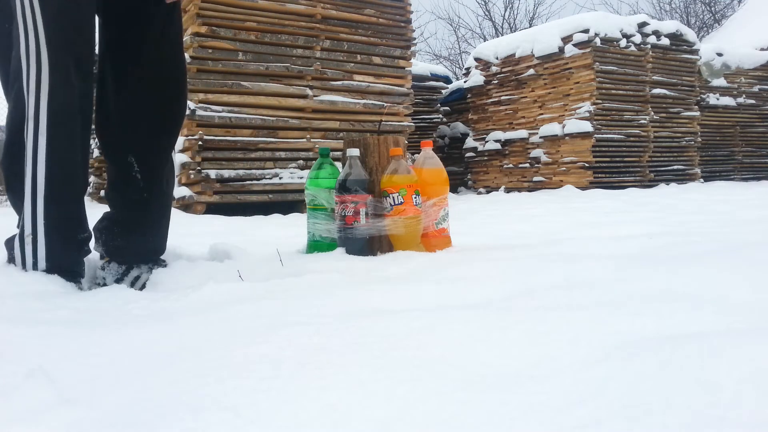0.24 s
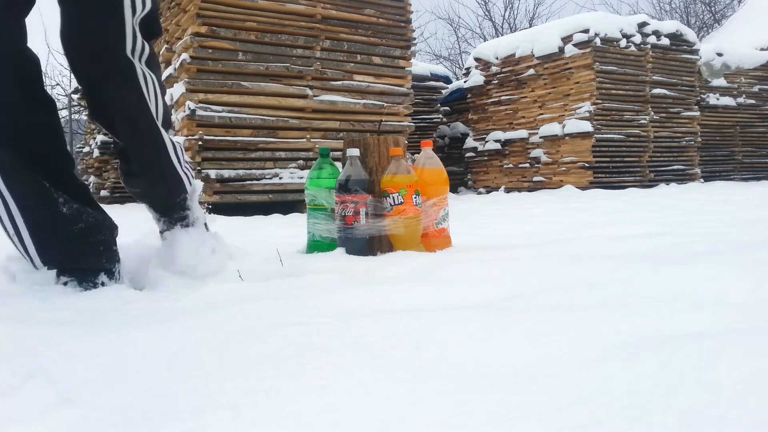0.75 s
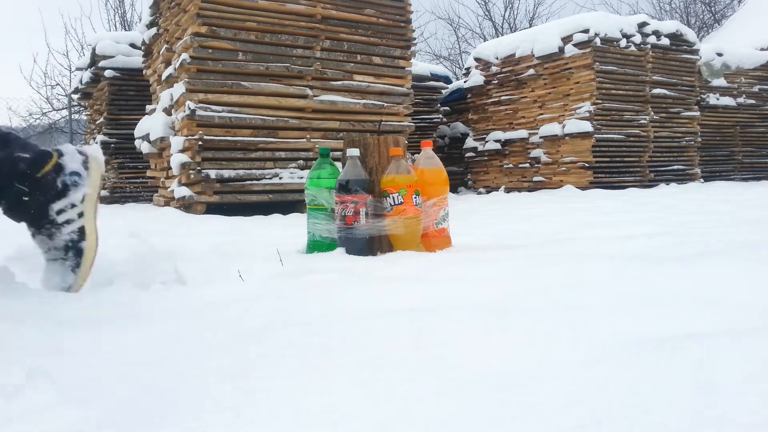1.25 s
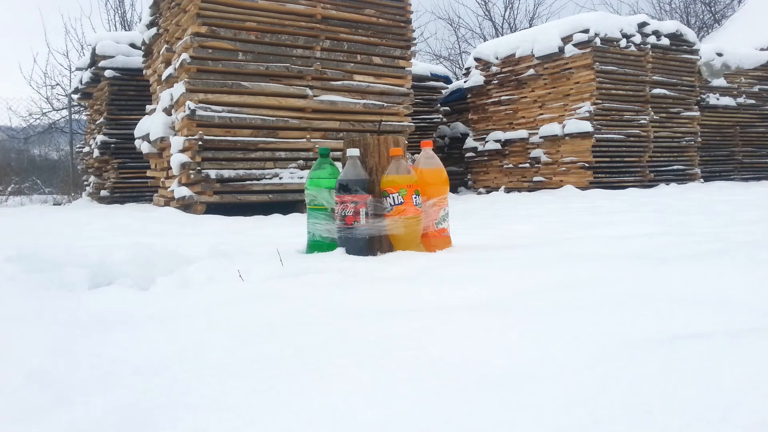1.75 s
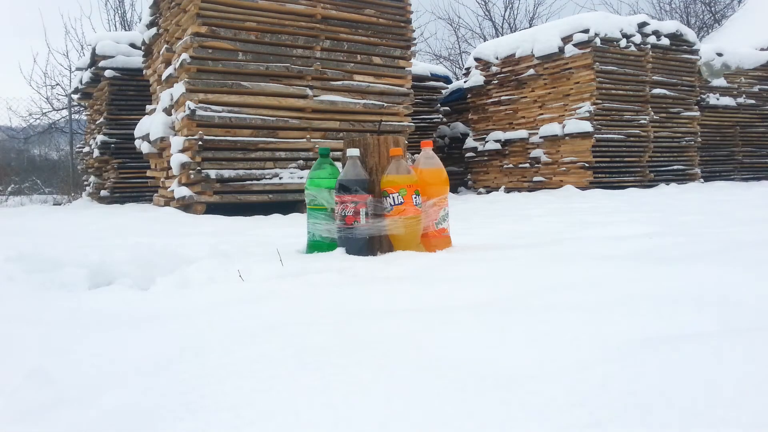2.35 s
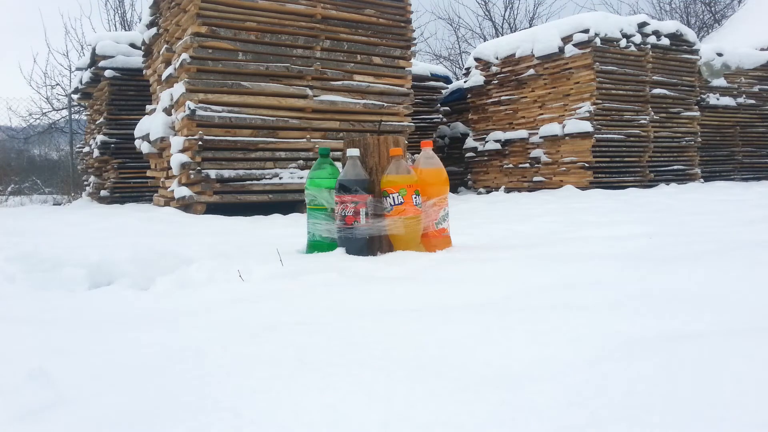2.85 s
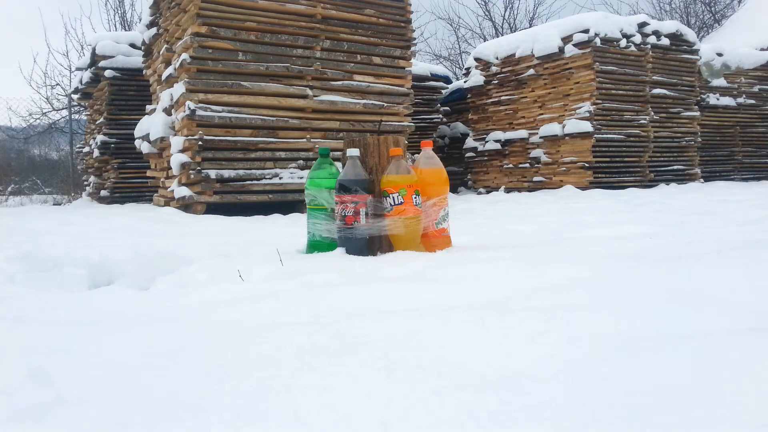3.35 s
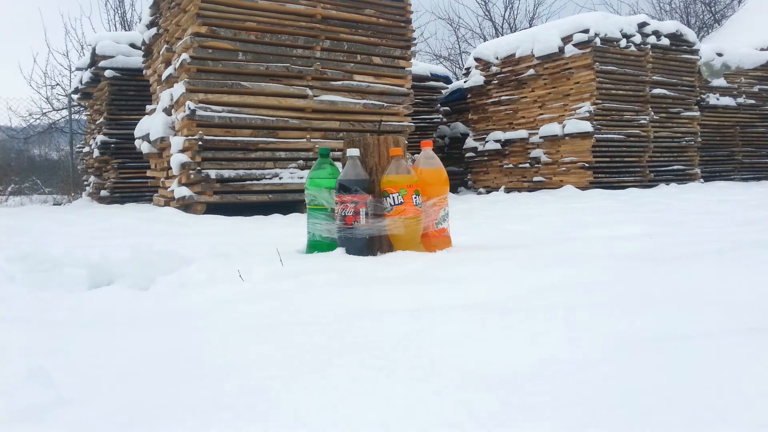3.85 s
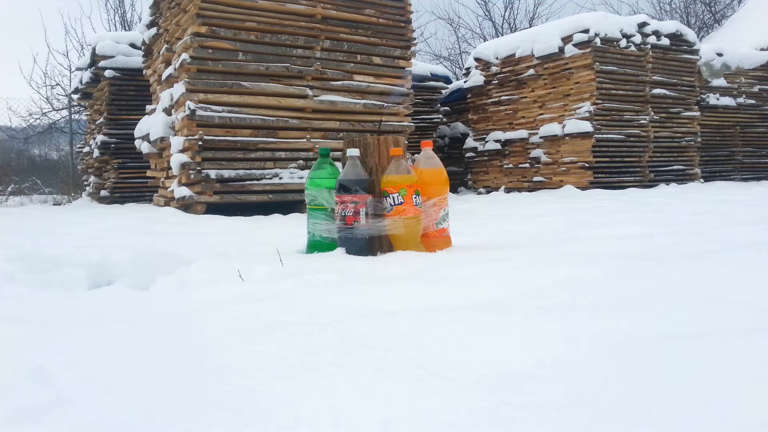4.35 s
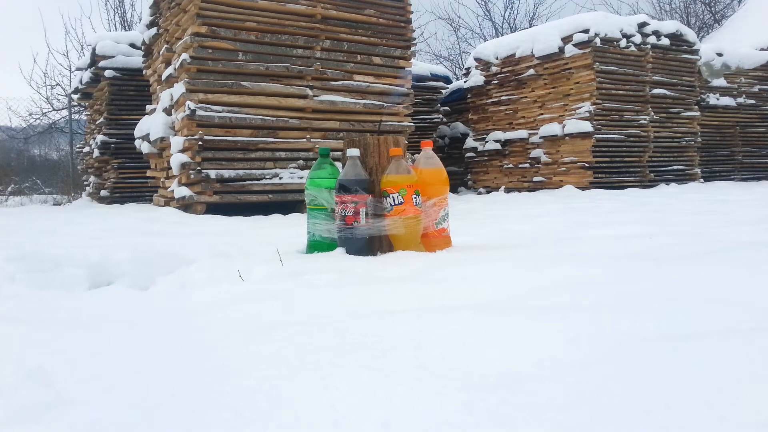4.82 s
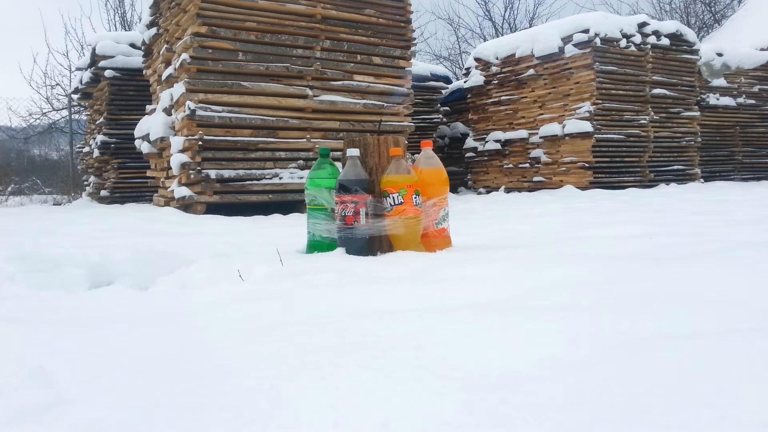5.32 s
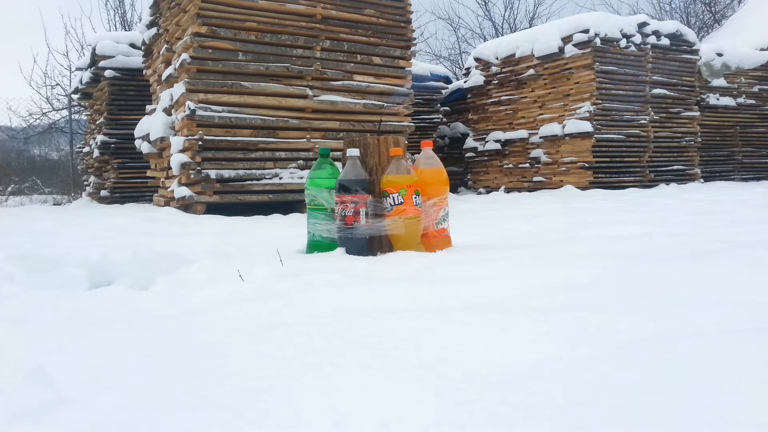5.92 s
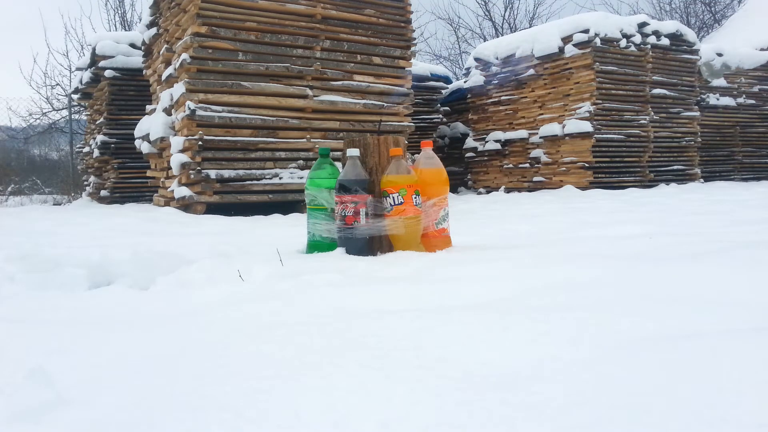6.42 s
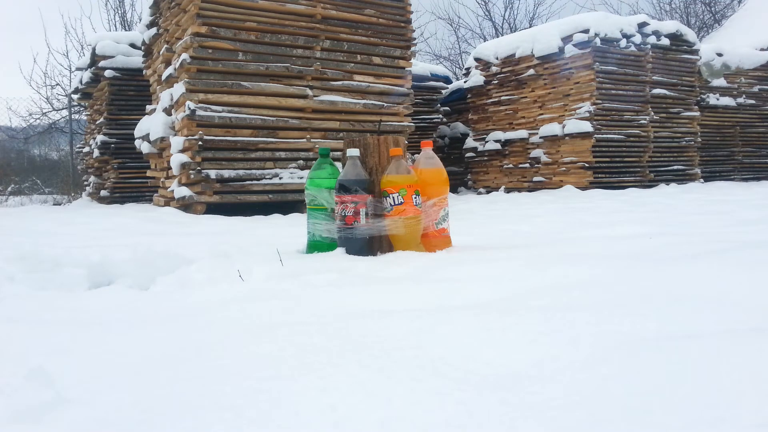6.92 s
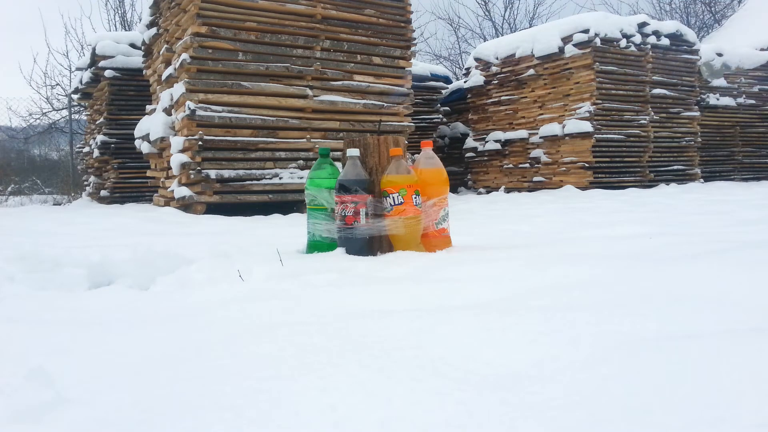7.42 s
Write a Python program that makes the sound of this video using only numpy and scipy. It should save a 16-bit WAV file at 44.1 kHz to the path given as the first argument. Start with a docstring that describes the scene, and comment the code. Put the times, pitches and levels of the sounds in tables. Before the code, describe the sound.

In a quiet snowy yard, shoes shift and crunch close by as a fuse fizzes and pops softly, with one much louder pop. It flares into a rough, sputtering jet full of snapping sparks, then thins to a bright steady fizz with a faint high whistle. Later, muffled jogging steps scuff away in the snow and one small hard clack sounds on the left. Stereo microphones near the ground, dry open air.

```python
"""Firecracker fuse in a snowy yard

A fuse sputters and pops, flares into a rough rushing jet, then settles to a bright fizz.
Jet and fizz are shaped noise with sparks and crackles; short chokes dip both, and spits swell the jet.
Pops are short filtered pulses, and a thin whistle of wavering sine tone runs throughout.
Shoes shift in the snow and jog further off, made of tiny random clicks; one sharp clack rings out."""
import sys
import numpy as np
from scipy import signal
from scipy.fft import rfft, irfft, next_fast_len
from scipy.io import wavfile
from scipy.ndimage import uniform_filter1d

SR = 44100
rng = np.random.default_rng(int(sys.argv[2]) if len(sys.argv) > 2 else 0)


def wav_record(signal):
    """Record a signal, one row per channel, as 16-bit PCM in the file named by sys.argv[1]."""
    frames = np.transpose(np.atleast_2d(signal))
    bounded = np.clip(frames, -1, 1)
    # unit amplitude maps onto the largest positive 16-bit level
    quanta = np.round(bounded * 32767).astype(np.int16)
    wavfile.write(sys.argv[1], SR, quanta)


N = 338247
TIME = np.arange(N) / SR  # seconds
SNOW_SETTLE_S = 0.054  # how slowly a step in the snow dies away


def from_db(db):
    """Turn decibels into a gain."""
    return 10 ** (np.asarray(db) / 20)


def rms_one(x):
    """Scale to an average power of 1."""
    return x / np.sqrt(np.mean(x ** 2) + 1e-20)


def in_time(rows):
    """Join the points of a (time, value) table by straight lines."""
    s, value = np.transpose(rows)
    return np.interp(TIME, s, value)


def over_hz(points):
    """Read a (frequency, value) table at every frequency of the spectrum, on a log axis."""
    hz, value = np.transpose(points)
    size = next_fast_len(N)
    spectrum_hz = np.arange(size // 2 + 1) * SR / size
    return np.interp(np.log(spectrum_hz + 1), np.log(hz), value)


def shape(x, gain):
    """Filter a sound by one gain per frequency."""
    size = next_fast_len(N)
    return irfft(rfft(x, size) * gain, size)[..., :N]


def band_pass(x, order, low_hz, high_hz):
    """Keep what lies between two frequencies."""
    return signal.sosfilt(signal.butter(order, [low_hz, high_hz], "band", fs=SR, output="sos"), x)


def drift(rate_hz):
    """Smooth random wandering with spread 1, made at a fortieth of the sample rate."""
    r = np.exp(-80 * np.pi * rate_hz / SR)
    slow = signal.lfilter([1], [1, -2 * r, r * r], rng.standard_normal(N // 40 + 2002))
    slow = slow[2000:]  # skip the filter's start-up
    return np.interp(np.arange(N) / 40, np.arange(len(slow)), rms_one(slow))


def grains(per_s, spread_db):
    """Random clicks of unequal size; a positive spread makes a few large, a negative one a few small."""
    sizes = from_db(spread_db * np.minimum(rng.exponential(1, N), 4)) * rng.choice([-1, 1], N)
    happens = rng.random(N) < per_s / SR
    return rms_one(sizes * happens / np.sqrt(per_s))


def bursts(rows, fall_s):
    """Add up events (s, dB, hold s, swell s): each swells, holds, then dies away."""
    out = np.zeros(N)
    for s, level_db, hold_s, swell_s in rows:
        start = max(int(s * SR), 0)
        age = TIME[start:][:SR] - s
        fade = np.exp(-np.maximum(age - hold_s, 0) / fall_s)
        out[start:][:SR] += from_db(level_db) * np.clip(age / swell_s, 0, 1) * fade
    return out


def outdoors(source, colour):
    """Colour a source; scatter from the snow and woodpiles makes the two channels differ."""
    # how alike the channels are: f/Hz, likeness/0-1 (anything above 1 counts as 1)
    likeness = [(100, 1.05), (400, 0.36), (900, 0.5), (2500, 0.77), (6000, 0.63), (13000, 0.22)]
    gain = rms_one(from_db(over_hz(colour)))
    alike = np.clip(over_hz(likeness), 0, 1)
    size = int(0.013 * SR)
    scatter = rng.standard_normal((2, size)) * np.linspace(1, 0, size) ** 2
    scatter /= np.sqrt(np.sum(scatter ** 2, axis=1, keepdims=True))
    # the scattered part is fresh noise that follows the source's smeared power
    power = signal.fftconvolve(source[None] ** 2, scatter ** 2, axes=1)[:, :N]
    diffuse = np.sqrt(np.maximum(power, 0)) * rng.standard_normal((2, N))
    return shape(source, gain * np.sqrt(alike)) + shape(diffuse, gain * np.sqrt(1 - alike))


def choking():
    """The flame is held back for an instant: each choke is a smooth dip (one is a slight rise), in dB."""
    # chokes: t/s, depth/dB, half-width/s
    choke_rows = [(0.639, 4, 0.023), (0.945, 3, 0.011), (1.499, 7.5, 0.0037), (1.762, 5, 0.023),
                  (1.883, 2.5, 0.012), (1.964, 4.5, 0.01), (2.227, 2.5, 0.021), (2.316, 2.5, 0.01),
                  (2.392, 7, 0.0046), (2.66, 9, 0.0052), (3.04, 4.5, 0.03), (3.27, -0.5, 0.021),
                  (3.455, 1.5, 0.021), (3.54, 12, 0.03), (3.615, 6.5, 0.017), (4.066, 3, 0.017),
                  (4.535, 3.5, 0.0099), (4.653, 4, 0.016), (4.773, 4, 0.034), (5.147, 5, 0.02),
                  (5.483, 6, 0.012), (6.03, 4.5, 0.021)]
    return sum(depth_db * np.exp(-.5 * ((TIME - s) / width_s) ** 2) for s, depth_db, width_s in choke_rows)


def fizz(lift_db=1.0, flutter_db=0.57, sway_db=1.0, crackle_db=-7, choke_share=0.99, sluggish_s=.025):
    """Powder grains flash one after another in a bright hiss that sways and dips with the longer chokes."""
    # slow strength of the fizz, before the lift: t/s, level/dB
    fizz_strength = [(-0.0, -51), (0.801, -49), (1.502, -55.5), (2.831, -47), (3.475, -49.5), (4.278, -44),
                     (4.416, -47.5), (4.841, -43), (5.313, -48.5), (5.85, -45.5), (6.756, -43.5),
                     (6.922, -45.5), (7.384, -43), (7.671, -42.5)]
    # its colour, relative: f/Hz, level/dB
    fizz_colour = [(120, -48), (250, -24), (500, -8), (1200, -4.5), (2500, -4), (4300, 0.5), (5500, 0.5),
                   (6400, 3.5), (8000, 1), (10400, 1), (11500, -1.5), (14500, -4)]
    # averaging over a short while blurs the shortest chokes
    dip_db = choke_share * uniform_filter1d(choking(), size=max(int(sluggish_s * SR), 1))
    wander_db = flutter_db * drift(23) + sway_db * drift(6.8)
    level_db = in_time(fizz_strength) + lift_db - dip_db + wander_db
    crackle = from_db(crackle_db) * grains(1500, spread_db=3.0)
    powder = rms_one(rng.standard_normal(N) + crackle)
    return outdoors(powder * from_db(level_db), fizz_colour)


def crunch(powder_db, clump_db):
    """Snow gives way in clumps of tiny fractures over a soft hiss of powder."""
    fractures = grains(750 * from_db(3 * drift(30)), spread_db=3.0)
    snow = fractures + from_db(powder_db) * rng.standard_normal(N)
    return rms_one(snow * from_db(clump_db * drift(66)))


def shuffling():
    """Close by, shoes shift in the snow as swells of crunch, and the crust snaps in brief noise bursts."""
    # shoes shifting: t/s, level/dB, hold/s
    shuffle_rows = [(0, -40, 0.063), (0.137, -53, .015), (0.213, -48, 0.09), (0.344, -49.5, 0.07),
                    (0.453, -56, 0.0085), (0.513, -50.5, 0.011), (0.681, -46, 0.067), (0.878, -45.5, 0.25)]
    # the snow crust snapping: t/s, level/dB, hold/s
    snap_rows = [(0.057, -36.5, 0.0021), (0.3705, -35, 0.0033), (0.378, -43.5, 0.005), (0.535, -43, .001),
                 (0.72, -40, .001), (0.8, -47, 0.0018)]
    # colours of snow and snaps, relative: f/Hz, level/dB
    snow_colour = [(60, -59), (160, -4), (350, -5.5), (520, -4), (720, -2), (1100, 3.5), (1600, 1.5),
                   (2500, -2), (4500, -4.5), (9000, -14.5)]
    snap_colour = [(200, -30), (1000, 6), (2000, -2), (3500, -2), (6000, -10), (12000, -13)]
    weight = bursts([(*row, 0.0032) for row in shuffle_rows], fall_s=SNOW_SETTLE_S)
    snaps = bursts([(*row, .0005) for row in snap_rows], fall_s=0.0028) * rng.standard_normal(N)
    shifting = weight * crunch(powder_db=-4, clump_db=1.0)
    return outdoors(shifting, snow_colour) + outdoors(snaps, snap_colour)


def whistle(whistle_db=-60.5, pitch_hz=7075, sag_hz_per_s=170, waver_hz=18, airy_db=-4, width_hz=45):
    """A thin high sine, made airy by random side tones, wavers and twice sags in pitch and snaps back."""
    # sags: start t/s, end t/s
    sag_rows = [(.45, .98), (5.25, 6.0)]
    sag_hz = sum(sag_hz_per_s * (TIME - start) * ((TIME > start) & (TIME < end)) for start, end in sag_rows)
    phase = 2 * np.pi * np.cumsum(pitch_hz - sag_hz + waver_hz * drift(12.4)) / SR
    air = drift(width_hz) * np.sin(phase) + drift(width_hz) * np.cos(phase)
    return from_db(whistle_db) * (np.sin(phase) + from_db(airy_db) * air)


def burble(per_s=90, clump_db=2):
    """Many tiny low puffs come in clumps, strongest as the fuse flares up."""
    # slow strength of the burble: t/s, level/dB
    burble_strength = [(0, -68), (.9, -65.5), (1.15, -50.5), (1.5, -58.5), (2.2, -55.5), (3, -65), (4, -75),
                       (5, -69.5), (7.67, -82)]
    # its colour, relative: f/Hz, level/dB
    burble_colour = [(60, -27), (140, -10), (230, 2.5), (400, -0.5), (800, -3.5), (2000, -24.5)]
    puffs = rms_one(grains(per_s, spread_db=-2.0) * from_db(clump_db * drift(7.7)))
    return outdoors(from_db(in_time(burble_strength)) * puffs, burble_colour)


def pops(low_hz=220, reach=1.67, tail_low_hz=125, tail_high_hz=380, tail_db=-13, scatter=0.08, scatter_s=0.003):
    """Each is one pressure pulse whose low end trails behind, roughened by the ground: a soft 'pup'."""
    # pops: t/s, level/dB of the main pulse's peak, f/Hz that sets how high the pop reaches
    pop_rows = [(0.0155, -31.5, 480), (0.033, -32, 320), (0.0383, -40, 380), (0.2386, -32, 380),
                (0.524, -31, 337), (0.6974, -15, 600), (1.136, -37.5, 332), (1.607, -26, 357),
                (1.649, -36.5, 296), (1.722, -42, 212), (1.835, -32.5, 260), (1.982, -35, 403),
                (2.188, -31.5, 275), (2.34, -36.5, 348), (2.518, -38.5, 320), (2.686, -37.5, 288),
                (3.707, -47, 234), (3.881, -43, 210), (4.228, -52, 320)]
    out = np.zeros(N)
    kick, age = signal.unit_impulse(4096), TIME[:4096]
    for s, peak_db, hz in pop_rows:
        size = (hz / 400) ** .5  # smaller for deeper pops
        bottom_hz = low_hz * size
        pulse = band_pass(kick, 3, bottom_hz, max(reach * hz, 1.3 * bottom_hz))
        # deeper pops carry more of their weight in a lower tail
        tail_scale = min(size, 1)
        tail = band_pass(kick, 3, tail_scale * tail_low_hz, tail_scale * tail_high_hz)
        tail_gain = from_db(tail_db) / size ** 2
        pop = pulse / np.abs(pulse).max() - tail_gain * tail / np.abs(tail).max()
        rough = rng.standard_normal(len(kick)) * age / scatter_s * np.exp(-age / scatter_s)
        ground = kick + scatter * rough
        at = round(s * SR)
        out[at:at + len(kick)] += from_db(peak_db) * signal.fftconvolve(pop, ground)[:len(kick)]
    return out


def sparks(per_s=260, spark_s=0.0008, spread_db=2.0):
    """Sparks fly at random; each is a tiny burst of noise that dies at once."""
    fade = np.exp(-2 / (spark_s * SR))  # power fades twice as fast as level
    power = signal.lfilter([1], [1, -fade], grains(per_s, spread_db) ** 2 + 1e-18)
    return rms_one(np.sqrt(power) * rng.standard_normal(N))


def jet(lift_db=1.5, flutter_db=1.15, spit_db=-6.0, spark_db=-7.5, surge_bright=0.95, spark_slope=0.26):
    """Hot gas rushes out unevenly, full of snapping sparks, with a shrill edge that comes and goes."""
    # slow strength of the jet, before the lift: t/s, level/dB
    jet_strength = [(0.872, -56.4), (0.891, -49.5), (0.99, -40.5), (1.46, -35), (1.753, -40),
                    (2.027, -37.5), (2.433, -44), (2.77, -41), (3.532, -47.5), (3.721, -44), (4.226, -49),
                    (4.335, -67)]
    # the jet catches and later eases off: t/s, share of its strength/0-1
    flare = [(.82, 0.2), (.88, 0.97), (4.35, 1), (4.8, 0.7)]
    # the shrill edge against the gas: t/s, level/dB
    edge_strength = [(.9, -32), (1.45, -0.5), (2.3, -36), (2.8, -2), (3.4, -14), (3.8, -7), (3.92, 5.5),
                     (4.4, -2)]
    # spits of flame, before the common spit level: t/s, level/dB, hold/s
    spit_rows = [(1.046, -40.5, 0.025), (1.19, -40.5, 0.049), (1.428, -48, 0.033), (1.924, -46, 0.018),
                 (2.139, -37.5, 0.025), (2.254, -40, 0.025), (2.345, -42, 0.022), (2.505, -47, 0.19),
                 (2.748, -42, 0.027), (3.08, -45.5, 0.072), (3.318, -50, 0.087), (3.649, -50, 0.054),
                 (3.855, -41.5, 0.037), (4.132, -47, 0.036), (4.21, -53, 0.054)]
    # its colour, relative: f/Hz, level/dB
    jet_colour = [(100, -68), (200, -21), (350, -15), (600, -14), (1100, -4), (2000, -2.5), (3000, 0),
                  (4500, -3.5), (6000, -7), (8000, -10), (10500, -15), (13000, -24.5)]
    steady_db = in_time(jet_strength) + lift_db
    edge_db = in_time(edge_strength)
    spits = from_db(spit_db) * bursts([(*row, 0.0051) for row in spit_rows], fall_s=.005)
    flow = from_db(steady_db - choking() + flutter_db * drift(35)) + spits
    # the duller the jet burns, the more its sparks stand out
    sparky = from_db(spark_db - spark_slope * (edge_db - edge_db.mean()))
    gas = (rng.standard_normal(N) + sparky * sparks()) / np.sqrt(1 + sparky ** 2)
    edge = band_pass(gas, 1, 4200, 7500)
    # every spit is brighter, every choke duller
    surge = (flow / from_db(steady_db)) ** surge_bright - 1
    alight = np.clip(in_time(flare), 0, 1)
    rush = gas + (from_db(edge_db) + surge) * edge
    return outdoors(alight * flow * rush, jet_colour)


def jogging(creak_hz=530):
    """With distance the fractures of each stride blur into a scuff; packed snow creaks under the first two."""
    # strides: t/s, level/dB
    stride_rows = [(5.399, -47.5), (5.747, -48.5), (6.039, -48), (6.348, -49), (6.66, -48.5), (6.979, -48),
                   (7.30, -47.5)]
    # packed snow creaking under a heel: t/s, level/dB, hold/s
    creak_rows = [(5.399, -55.5, 0.045), (5.753, -50, 0.016)]
    # colour of the scuffs, relative: f/Hz, level/dB
    stride_colour = [(70, -36), (165, 0), (330, -9), (520, -0.5), (750, -7), (1100, -1), (1600, 1),
                     (2500, -2.5), (4500, -6), (9000, -16)]
    hold_s, swell_s = .11, .03
    weight = bursts([(*row, hold_s, swell_s) for row in stride_rows], fall_s=SNOW_SETTLE_S)
    creak_phase = 2 * np.pi * np.cumsum(creak_hz + 35 * drift(77.5)) / SR
    creak = np.sin(creak_phase) * from_db(2.5 * drift(90))
    scuffs = outdoors(weight * crunch(powder_db=3.5, clump_db=1.5), stride_colour)
    return scuffs + creak * bursts([(*row, .01) for row in creak_rows], fall_s=.015)


def clack(start_s=5.5172, clack_db=-35.5, tail_db=-7, tail_s=0.028, pan_db=9, crack_s=.003):
    """Off to the left a small hard thing is knocked; it cracks, rings and scatters off the woodpiles."""
    # ringing tones: f/Hz, level/dB, time to fall by 60 dB/s
    clack_modes = [(2835, -5.5, 0.18), (2890, 4.5, 0.033), (3750, -2, 0.04), (5050, -5, 0.06),
                   (5300, -1, 0.022), (5860, -1, .04)]
    age = np.clip(TIME - start_s, 0, 1)
    ring = sum(from_db(db - 60 * age / t60) * np.sin(2 * np.pi * hz * age) for hz, db, t60 in clack_modes)
    # too small to radiate bass
    ring = signal.sosfilt(signal.butter(2, 1800, "high", fs=SR, output="sos"), ring)
    scatter = rms_one(band_pass(rng.standard_normal((2, N)), 2, 2400, 6200))
    fade = np.exp(-age / crack_s) + from_db(tail_db) * np.exp(-age / tail_s)
    channel_db = clack_db + np.array([[.5], [-.5]]) * pan_db
    return from_db(channel_db) * (ring + scatter * (age > 0) * fade)


def scene(air_db=-86):
    """Two microphones hear the yard with slightly different colour and phase, over still winter air."""
    # left against right: f/Hz, level/dB
    balance = [(200, 1), (700, -0.2), (2500, -0.3), (4400, -1), (6500, -3), (9000, -3.5), (14000, -1.5)]
    # the phase by which the left leads: f/Hz, phase/radians
    lead = [(100, -0.15), (450, -0.73), (1000, -0.57), (2400, -0.03), (4500, -0.35), (5800, -1.44),
            (6800, -0.91), (9500, -0.1), (14000, -0.54)]
    # colour of the air, relative: f/Hz, level/dB
    air_colour = [(15, -50), (30, 25), (60, 13), (150, -29), (1000, -47), (10000, -60)]
    mix = jet() + fizz() + burble() + pops() + shuffling() + jogging() + clack() + whistle()
    side = np.array([[1], [-1]]) / 2  # each channel takes half of the difference
    placed = shape(mix, from_db(side * over_hz(balance)) * np.exp(1j * side * over_hz(lead)))
    air = rms_one(shape(rng.standard_normal((2, N)), from_db(over_hz(air_colour))))
    return placed + from_db(air_db) * air


def record(dry):
    """The microphone thins the deepest bass a little, and the top is cut steeply."""
    thinned = signal.sosfilt(signal.butter(1, 15, "high", fs=SR, output="sos"), dry)
    cutoff_hz = 14600
    return signal.sosfilt(signal.ellip(12, .1, 80, cutoff_hz, fs=SR, output="sos"), thinned)


dry = scene()
out = record(dry)
wav_record(out)
```